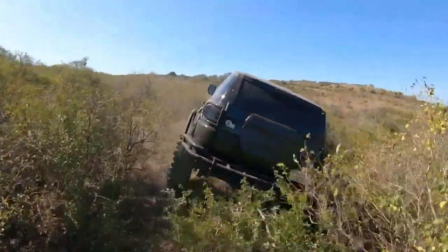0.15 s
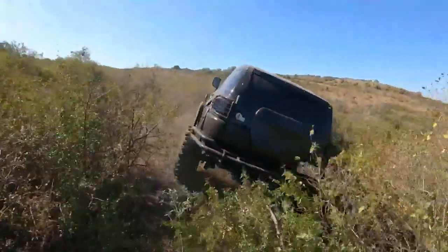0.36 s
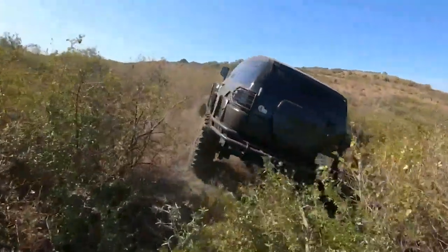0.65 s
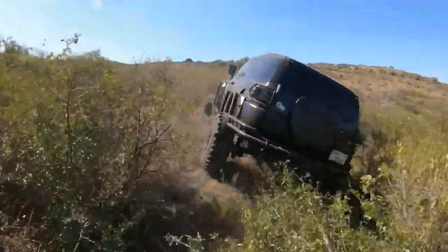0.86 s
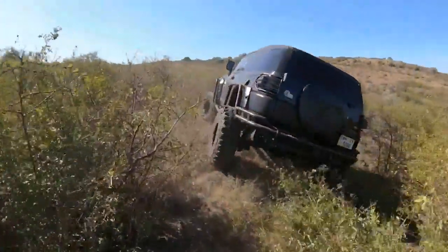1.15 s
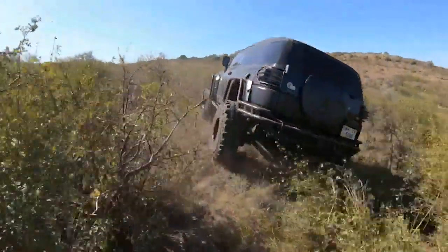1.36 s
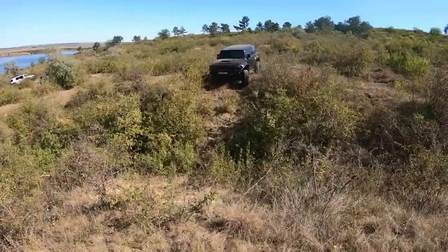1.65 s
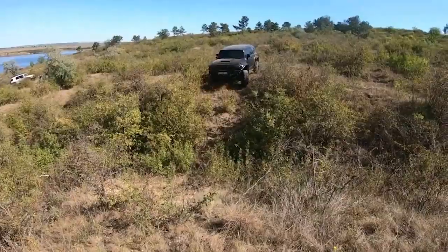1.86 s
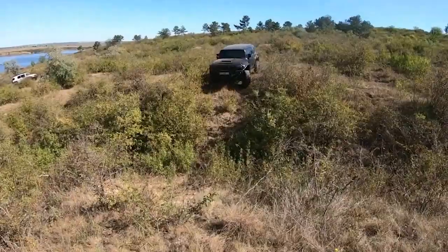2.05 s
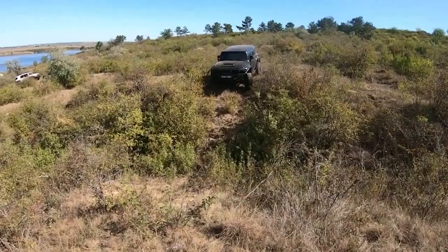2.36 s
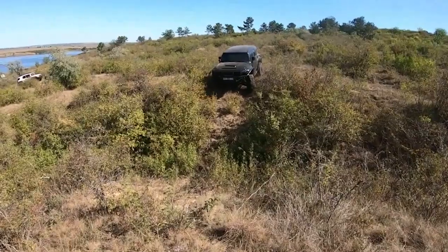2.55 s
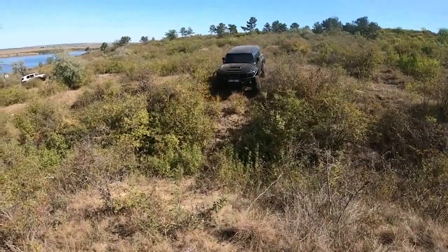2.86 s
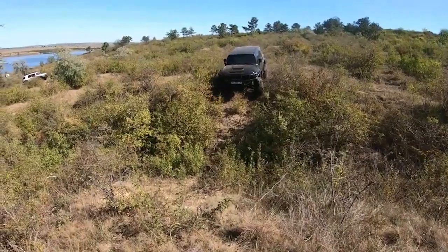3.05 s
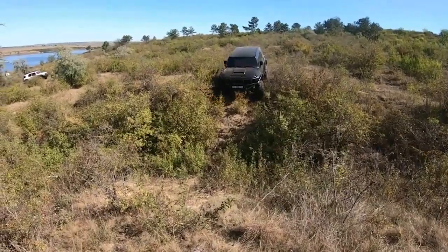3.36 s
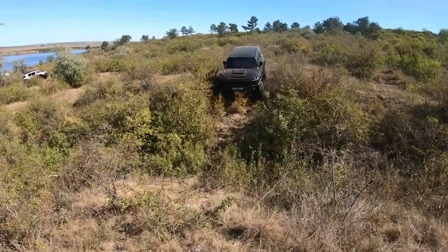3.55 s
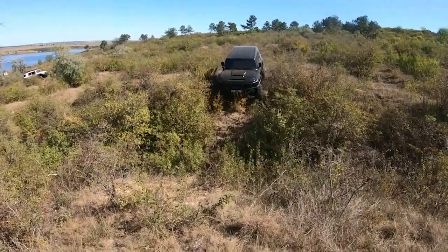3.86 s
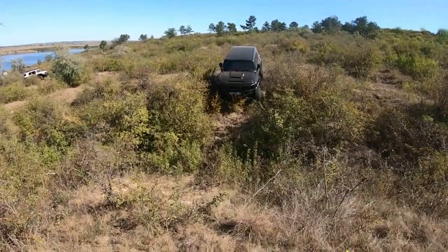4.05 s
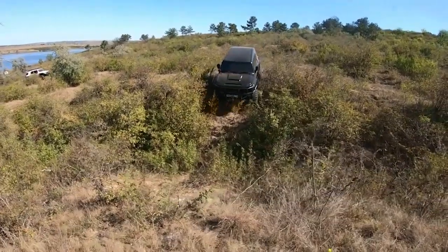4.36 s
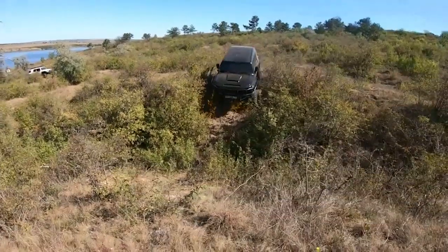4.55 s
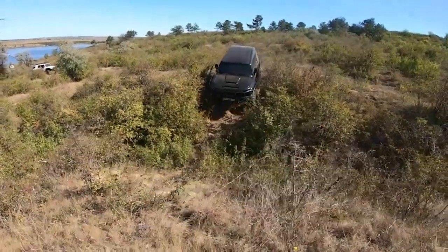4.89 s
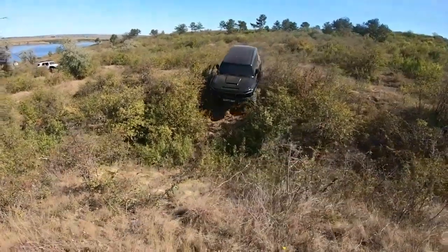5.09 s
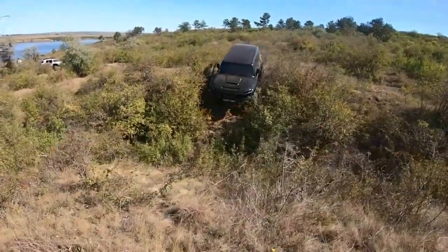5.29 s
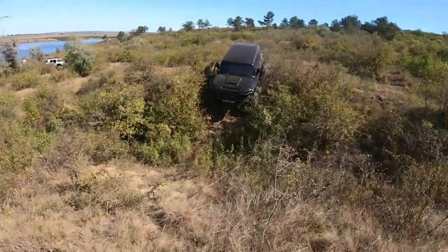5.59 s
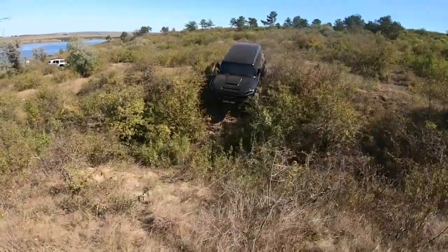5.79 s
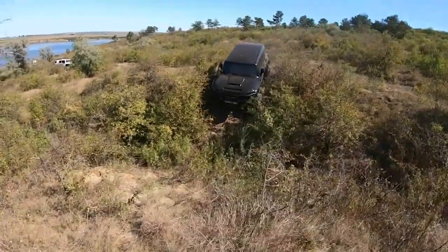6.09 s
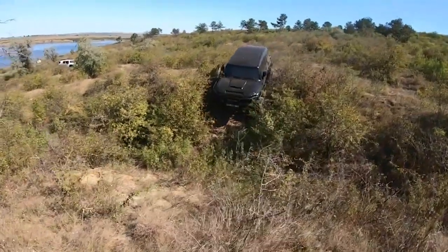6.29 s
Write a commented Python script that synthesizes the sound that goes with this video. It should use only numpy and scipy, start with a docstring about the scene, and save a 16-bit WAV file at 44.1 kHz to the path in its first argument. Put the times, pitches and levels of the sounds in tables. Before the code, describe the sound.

From 0 to 1.6 s an off-road vehicle is close: a loud, smooth, deep exhaust hum around 115 Hz, wavering as revs sag near 0.5 s and rise, sag and rise again, with thin whines and gassy tailpipe breath. Bright leafy hiss and sharp twig cracks come every few tenths of a second. At 1.62 s a hard cut drops the engine to a quieter, slower, rougher drone farther off, joined by a gliding second hum until 3.3 s. Wind gusts rumble low, strongest near 2.7 and 3.4 s, while only small ticks sound. At 3.8 to 3.9 s loud snaps burst out, then a faint gritty branch squeak on a panel around 4.1 s. Cracks, crunches and rustles continue, high ticks near 5.2 s, low knocks leaning right. At 6.05 s a heavy branch cracks and a panel thumps, ringing briefly; the engine and crunching continue to 6.4 s.

```python
"""Dry scrub: an off-road vehicle crawls by, heard from close behind, then after a hard cut from the front, further off.
Its six-cylinder exhaust is a sum of wavering tones locked to the engine cycle; a second hum glides past them.
Twigs snap as bursts through resonances, bushes rustle as clusters of ringing stems, and a branch squeaks
on a panel as bands of grit, all over a rush of filtered noise and crackle.
Gusts rumble on the two microphone ports as separate low noises."""
import sys
import numpy as np
from scipy import signal
from scipy.fft import rfft, irfft, next_fast_len
from scipy.io import wavfile
from scipy.ndimage import uniform_filter1d

SR = 44100
rng = np.random.default_rng(int(sys.argv[2]) if len(sys.argv) > 2 else 0)


def dump_mix(stems):
    """Bounce the given channels to the path in sys.argv[1] as a 16-bit WAV at rate SR."""
    frames = np.atleast_2d(stems).T  # one column per channel
    limited = np.clip(frames, -1, 1)  # hard clip at full scale
    pcm = np.round(limited * 32767).astype(np.int16)
    wavfile.write(sys.argv[1], SR, pcm)


N = 283563
WAVER_DB = 1.8  # rms waver of each weaker engine line; the whines waver twice as much
KNOCK_BELOW_HZ = 1500  # snaps and crunches pitched below this follow KNOCK_SIDE

# Where low knocks and crunches lie, moving to the right: (time [s], left minus right [dB])
KNOCK_SIDE = [(4.6, -1), (4.85, -5)]


def undb(db):
    """Decibels to gain."""
    return 10 ** (np.asarray(db) / 20)


def unit(x):
    """Scale to rms 1."""
    return x / np.sqrt(np.mean(x ** 2))


def peak(x):
    """Scale to peak 1."""
    return x / np.abs(x).max()


def pan(db):
    """Gains of the two ports for a left minus right difference in dB."""
    return undb(np.array([db, -db]) / 2)


def curve(rows):
    """Join the rows of a (time [s], ...) table by straight lines: one value per sample for each column."""
    s, *columns = np.transpose(rows)
    return [np.interp(np.arange(N) / SR, s, c) for c in columns]


def fade(start, end, rise, fall):
    """A straight-sided envelope between two times, all in seconds."""
    t = np.arange(N) / SR
    return np.clip(np.minimum((t - start) / rise, (end - t) / fall), 0, 1)


def walk(rate):
    """Random levels, `rate` of them per second, slewed from one to the next; rms 1."""
    k = int(SR / rate)
    steps = np.repeat(rng.standard_normal(N // k + 1), k)
    return unit(uniform_filter1d(steps, k)[:N])


def shape(x, rows, gain=undb):
    """Filter by (frequency [Hz], value) points joined on a log-frequency axis."""
    hz, value = np.transpose(rows)
    n = next_fast_len(N)
    log_hz = np.log(np.arange(n // 2 + 1) * SR / n + 1)
    response = gain(np.interp(log_hz, np.log(hz), value))
    return irfft(rfft(x, n) * response, n)[..., :N]


def band(x, hz, width):
    """Two-pole resonance, gain 1 at the centre; width in Hz."""
    return signal.lfilter(*signal.iirpeak(min(hz, .45 * SR), hz / width, fs=SR), x)


def ports(a, b):
    """Spread two unrelated signals over the ports: alike in the bass, mostly apart in the high treble."""
    # Likeness of the two ports: (frequency [Hz], correlation)
    alike = [(100, 1), (300, 1), (600, 0.94), (1200, 0.52), (2500, 0.91), (5000, 0.86), (8000, 0.05),
             (12000, 0.25)]
    mid = shape(a, alike, lambda c: np.sqrt((1 + np.clip(c, 0, 1)) / 2))
    side = shape(b, alike, lambda c: np.sqrt((1 - np.clip(c, 0, 1)) / 2))
    return np.array([mid + side, mid - side])


def exhaust(rows, uneven, throb, order):
    """Unequal cylinders sound lines at multiples of the cycle rate around a boom at `order` times the firing rate."""
    # A resonance that lifts lines passing through it: (frequency [Hz], width [Hz], greatest lift [dB])
    side_pipe = (146.3, 12.7, 14)
    pipe_hz, pipe_width, pipe_db = side_pipe
    silencer_lag = 0.38  # cycles of their own by which lines above the silencer resonance trail

    hz, boom_db = curve(rows)
    running = np.arange(N) >= rows[0][0] * SR
    firing = np.cumsum(hz * running) / SR  # firings so far
    out = undb(boom_db + walk(25)) * np.cos(2 * np.pi * order * firing)
    for turns, db in uneven:
        above = turns - 6 * order  # six firings per engine cycle
        phase = turns * firing / 6 + throb * above - silencer_lag * (above > 0)
        lift_db = pipe_db / (1 + (2 * (turns * hz / 6 - pipe_hz) / pipe_width) ** 2)
        level = undb(boom_db + db + lift_db + WAVER_DB * walk(7))
        out = out + level * np.cos(2 * np.pi * phase)
    return np.sqrt(2) * out, firing


def behind():
    """Close behind: exhaust lines, thin whines, a noisy skirt, and gas puffs that ring the tailpipe once per firing."""
    # Engine: (time [s], firing rate [Hz], mean level of the boom an octave above it [dB])
    engine = [(0.0, 58.44, -22), (0.14, 57.08, -20.5), (0.27, 58.4, -22.5), (0.54, 53.68, -23),
              (0.81, 60.9, -20), (0.94, 60.94, -20.5), (1.22, 55.87, -25.5), (1.35, 57.3, -20),
              (1.62, 63.1, -19.5)]
    # Weaker lines: (turns per engine cycle, level against the boom before the pipe's lift [dB])
    uneven_lines = [(9, -24.5), (11, -15), (13, -10), (16, -23.5), (17, -23), (18, -24.5)]
    # Thin tones at reference revs: (frequency [Hz], slope [Hz per Hz of firing rate], peak level at mean boom [dB])
    whine_rows = [(460.5, 2.2, -43.5), (258.3, 1.78, -45.5), (531, 2.16, -53), (691, 3.1, -54.5)]
    # Gas rings here: (frequency [Hz], width [Hz], level at mean boom [dB])
    tailpipe = [(250, 46, -46), (480, 36, -47), (620, 190, -50)]
    reference_hz = 57.8  # firing rate
    effort = 0.88  # dB that gas and whines gain per dB of boom

    boom, firing = exhaust(engine, uneven_lines, throb=0.15, order=2)  # throb caught this early, in cycles
    hz, boom_db = curve(engine)
    # The firing tone thins against its octave as the revs rise.
    tone_db = boom_db - 4 - 0.5 * (hz - reference_hz)
    tone = np.sqrt(2) * undb(tone_db) * np.cos(2 * np.pi * firing)

    whine = 0
    for f, slope, db in whine_rows:
        level = undb(db + 2 * WAVER_DB * walk(11.58))
        whine_hz = f + slope * (hz - reference_hz) + 3 * walk(8.3)
        whine = whine + level * np.cos(2 * np.pi * np.cumsum(whine_hz) / SR)

    puff = .2 + np.exp(-(firing % 1) / .3)
    gas = 0
    for f, width, db in tailpipe:
        breath = puff * (0.1 + rng.standard_normal(N))
        gas = gas + undb(db) * unit(band(breath, f, width))

    skirt = undb(-39.5) * unit(band(band(rng.standard_normal(N), 142, 72), 142, 72))
    return boom + tone + undb(effort * (boom_db - boom_db.mean())) * (whine + gas) + skirt


def ahead():
    """From the front, further off: the slower engine, and a hum as one tone of gliding pitch."""
    # Engine: (time [s], firing rate [Hz], mean level of the boom at three times that rate [dB])
    engine = [(1.63, 40.26, -34.5), (2.26, 41.19, -35), (2.88, 40.12, -40), (3.09, 43.65, -35.5),
              (3.3, 46, -49), (3.4, 44.24, -40), (3.51, 41.82, -35), (3.72, 39.92, -33.5),
              (4.3, 37.5, -35.5), (4.7, 39.6, -31.5), (5.18, 37.78, -37), (5.4, 35.3, -37.5),
              (5.8, 36.08, -35), (6.01, 38.13, -33.5), (6.43, 37.67, -32.5)]
    # Weaker lines: (turns per engine cycle, level against the boom before the pipe's lift [dB])
    uneven_lines = [(6, -10.5), (12, -9.5), (16, -14), (17, -11.5), (19, -6.5), (24, -19)]
    # Second hum: (time [s], frequency [Hz], level [dB])
    hum_rows = [(1.85, 118.5, -37.5), (1.95, 130.2, -45), (2.27, 144.8, -33), (2.45, 146.3, -37),
                (2.65, 145.2, -35.5), (2.9, 137.5, -33), (3.1, 143.7, -44), (3.22, 157.3, -38.5),
                (3.32, 160, -72)]
    boom, _ = exhaust(engine, uneven_lines, throb=0.139, order=3)
    hz, db = curve(hum_rows)
    hum = np.sqrt(2) * undb(db) * np.cos(2 * np.pi * np.cumsum(hz) / SR)
    return boom + hum


def snaps():
    """Each twig breaks with one clean crack that rings its modes; its fibres tear for a moment after."""
    # Thick wood knocks low, thin stems tick high: (time [s], peak before panning [dB], pitch [Hz])
    snap_rows = [(0.028, -19, 1450), (0.2833, -20.5, 3970), (0.4425, -27, 4760), (0.5969, -18, 2940),
                 (0.856, -24, 2947), (1.053, -30, 6505), (1.4231, -21.5, 1004), (1.6643, -20.5, 2797),
                 (2.78, -34, 6800), (3.046, -36, 6460), (3.229, -38, 4950), (3.434, -31.5, 5050),
                 (3.8293, -16.5, 3600), (3.8707, -21.5, 3396), (3.8956, -16, 1760), (4.002, -27, 1210),
                 (4.1844, -30, 886), (4.2777, -24, 6500), (4.3997, -25.5, 4460), (4.605, -38, 899),
                 (4.7084, -25.5, 8040), (4.8474, -26, 7060), (4.8813, -21, 830), (4.915, -28, 8000),
                 (5.011, -27, 7970), (5.2088, -23, 9000), (5.23, -19, 9200), (5.4302, -27, 789),
                 (5.662, -28, 1490), (5.684, -26, 907), (5.986, -34, 3570), (6.0518, -16.5, 902),
                 (6.2036, -23, 1515), (6.312, -26.5, 4400), (6.391, -33, 7240)]
    # Modes of a twig: (multiple of the pitch, level [dB])
    twig = [(1, 12), (3, -3.5)]
    # The bright edge of every break: (frequency [Hz], level [dB])
    tick = (9500, -5.5)
    mode_width = 0.7  # against the mode's frequency
    fray, fray_s = 0.25, 0.0018  # share and decay [s] of the tearing

    out, n = np.zeros((2, N)), int(0.025 * SR)
    t, knock_db = np.arange(n) / SR, curve(KNOCK_SIDE)[0]
    for s, db, hz in snap_rows:
        # Tearing partly shared by the ports, partly each port's own.
        tearing = rng.standard_normal(n) + 1.13 * rng.standard_normal((2, n))
        burst = fray * np.exp(-t / fray_s) * tearing
        burst[:, 0] = -2  # the crack
        modes = [(k * hz, mode_db) for k, mode_db in twig if k * hz < tick[0]] + [tick]
        snap = sum(undb(mode_db) * peak(band(burst, f, mode_width * f)) for f, mode_db in modes)
        i = int(s * SR)
        gains = undb(db) * pan(knock_db[i] * (hz < KNOCK_BELOW_HZ))
        out[:, i:i + n] += (gains[:, None] * peak(snap))[:, :N - i]
    return out


def thump():
    """The biggest branch sets a body panel ringing: one low mode that swells briefly and dies."""
    # Panel mode: (time [s], frequency [Hz], level its decay starts from [dB], t60 [s])
    panel = (6.05, 176, -35, .8)
    s, hz, db, t60 = panel
    t = np.maximum(np.arange(N) / SR - s, 0)
    swell = 1 - np.exp(-t / .05)
    return undb(db - 60 * t / t60) * swell * np.sin(2 * np.pi * hz * t)


def scrapes():
    """A branch stick-slips on a panel, too uneven for a pitch: bands of grit at multiples of the slip rate."""
    # Drags: (start [s], end [s], slips per second [Hz], level of the strongest band before its fades [dB])
    drags = [(3.99, 4.23, 2080, -44.5)]
    grit, out = ports(*(grains(1900, 2.2, 1.0) for _ in range(2))), 0
    for start, end, hz, db in drags:
        for k, share_db in enumerate([-6, 0, -8], 1):  # strongest at the second multiple
            ring = band(band(grit, k * hz, k * 750), k * hz, k * 750)
            out = out + undb(db + share_db) * fade(start, end, .06, .09) * unit(ring)
    return out


def rustles():
    """Each bush crushed or swept aside is a cluster of stems of nearby pitches, each crackling on its own."""
    # Bushes: (start [s], length [s], centre [Hz], level before swell and panning [dB])
    bushes = [(0.024, 0.024, 1930, -33), (0.441, 0.051, 1360, -41.5), (0.649, 0.02, 2300, -40),
              (1.185, 0.042, 2200, -43), (1.228, 0.064, 3260, -44.5), (1.329, 0.05, 2210, -36.5),
              (1.903, 0.17, 1900, -47), (3.759, 0.26, 4500, -50), (3.995, 0.054, 695, -46.5),
              (4.394, 0.075, 4430, -51), (4.594, 0.09, 905, -47.5), (4.725, 0.039, 3530, -45),
              (4.787, 0.039, 1290, -46), (4.766, 0.24, 8400, -51), (4.853, 0.077, 1490, -45.5),
              (4.979, 0.07, 8300, -50.5), (5.203, 0.06, 2993, -48.5), (5.4, 0.12, 1516, -48),
              (5.49, 0.17, 938, -46), (5.797, 0.1, 3350, -46), (6.258, 0.054, 884, -45),
              (6.347, 0.15, 798, -45)]
    stem_octaves = .5  # spread of the stems above and below the centre

    crunch = ports(*(grains(700, 3, 1.2) + .3 * rng.standard_normal(N) for _ in range(2)))
    patchy, knock_db, out = undb(5 * walk(60)), curve(KNOCK_SIDE)[0], np.zeros((2, N))
    for start, length, hz, db in bushes:
        i = int(start * SR)
        n = min(int(length * SR), N - i)
        bush = 0
        stems = hz * 2 ** np.linspace(-stem_octaves, stem_octaves, 5)
        for f, at in zip(stems, rng.integers(N // 2, size=5)):
            # Every stem takes its own random stretch of crunch.
            crackle = patchy[at:at + n] * crunch[:, at:at + n]
            bush = bush + unit(band(band(crackle, f, f / 3), f, f / 3))
        swell = fade(start, start + length, 0.086 * length, 0.39 * length)[i:i + n]
        gains = undb(db) * pan(knock_db[i] * (hz < KNOCK_BELOW_HZ))
        out[:, i:i + n] += gains[:, None] * swell * unit(bush)
    return out


def brush():
    """Steady rush of brush and tyres with crackle in it; neighbouring bands flicker together and alone."""
    # Brush and tyres: (time [s], rush [dB], extra leaf hiss, full in the treble [dB])
    rush = [(0, -38.5, 5), (1.0, -44, 7.5), (1.1, -39.5, 8), (1.618, -43, 6), (1.628, -42.5, -3.5),
            (3.3, -43, -5.5), (3.7, -43.5, -0.5), (6.43, -43, -3.5)]
    # Fine crackle: (time [s], level against the noise of the rush [dB])
    crackle_rows = [(1.6, -7.5), (1.7, -9), (3.6, -6.5), (4.4, -7.5)]
    # Colour of the rush: (frequency [Hz], relative level per Hz [dB])
    colour = [(30, -18), (170, -8.5), (220, -12.5), (320, -16.5), (420, -12.5), (650, -19.5), (1400, -24.5),
              (3900, -27.5), (9000, -36.5), (15000, -41.5)]

    low_db, high_db = curve(rush)
    swell, out = walk(21.75), 0
    crackle = undb(curve(crackle_rows)[0])
    beds = []
    for _ in range(2):
        hiss = rng.standard_normal(N) + crackle * grains(180, 3.5, .7)
        beds.append(hiss + undb(-9.5) * plinks())
    bed = unit(shape(ports(*beds), colour))
    for hz in 32 * 2 ** np.arange(0, 9.1, .75):
        leafy = np.clip(np.log2(hz / 1200) / 3, 0, 1)
        db = low_db + leafy * high_db + .7 * swell + walk(9) + 1.6 * walk(45)
        triangle = [(hz / 2 ** .75, 0), (hz, 1), (hz * 2 ** .75, 0)]
        out = out + undb(db) * shape(bed, triangle, lambda g: g)
    return out


def grains(rate, spread_db, ms):
    """Random clicks of very unequal size, `rate` per second, each a burst of noise decaying over `ms`."""
    clicks = rng.random(N) < rate / SR
    size = clicks * undb(spread_db * rng.exponential(size=N))
    decay = np.exp(-1000 / (ms * SR))
    envelope = signal.lfilter([1], [1, -decay], np.minimum(size, 4))
    return unit(envelope * rng.standard_normal(N))


def plinks():
    """Sparse taps on dry stems of many sizes, each ringing briefly at its own pitch."""
    taps_per_s = 9  # at each pitch
    out = 0
    for hz in np.geomspace(450, 14000, 36):
        taps = (rng.random(N) < taps_per_s / SR) * rng.standard_normal(N)
        out = out + np.sqrt(hz) * unit(band(taps, hz, 4 * np.sqrt(hz)))
    return unit(out)


def wind():
    """Eddies buffet each port on its own; gusts, harder on the left, swell out of a light breeze."""
    # Gusts: (strongest at [s], rise [s], fall [s], level at the top before panning [dB])
    gust_rows = [(1.85, 0.18, 0.086, -34), (2.68, 0.17, 0.32, -27), (3.4, 0.14, 0.24, -27.5),
                 (3.65, 0.32, 0.12, -33)]
    breeze_db = -55.5
    edge_db = 4  # how far a gust is down one rise before or one fall after its top

    eddies = np.array([undb(3 * walk(18)) * rng.standard_normal(N) for _ in range(2)])
    buffeting = eddies + 0.71 * rng.standard_normal(N)  # a share common to both ports
    rumble = unit(shape(buffeting, [(12, -34), (35, 17.5), (70, 20.5), (110, 17.5),
                                    (200, 0.5), (330, -5.0), (700, -49)]))
    t = np.arange(N) / SR
    power = 0
    for s, rise, fall, db in gust_rows:
        away = np.maximum((s - t) / rise, (t - s) / fall)
        power = power + undb(db - edge_db * away ** 2) ** 2
    return rumble * (np.sqrt(power) * pan(1.5)[:, None] + undb(breeze_db))


def scene():
    """A hard cut swaps one engine for the other within a few milliseconds; scrub and wind run throughout."""
    # Balance of the scrub: (time [s], left minus right [dB])
    scrub_side = [(0, -1), (1.6, -2.5), (1.65, 1.5), (4.7, 1.5), (4.85, -3)]
    cut_s = 1.622
    later = np.clip((np.arange(N) / SR - cut_s) / 0.011 + .5, 0, 1)
    engine = (1 - later) * behind() + later * ahead()
    scrub = (brush() + rustles() + snaps() + scrapes()) * pan(curve(scrub_side)[0])
    return engine + scrub + thump() + wind()


def record(dry):
    """The microphone housing colours the treble, the left port is duller in places; the top is cut."""
    # Left port: (frequency [Hz], level against the right [dB])
    left_port = [(400, -0.5), (1100, -3), (3400, -1), (6000, 2), (10800, -6.5), (13000, -4)]
    # Housing of both ports: (frequency [Hz], gain [dB])
    housing = [(3900, 1), (5300, -4.5), (6300, 1), (8400, 0), (9600, 5.5), (10400, 2), (11400, -7),
               (14000, -9), (15200, -25)]
    top_hz = 15500
    wet = shape(np.array([shape(dry[0], left_port), dry[1]]), housing)
    return signal.sosfilt(signal.ellip(8, .2, 70, top_hz, fs=SR, output="sos"), wet)


dry = scene()
out = record(dry)
dump_mix(out)
```